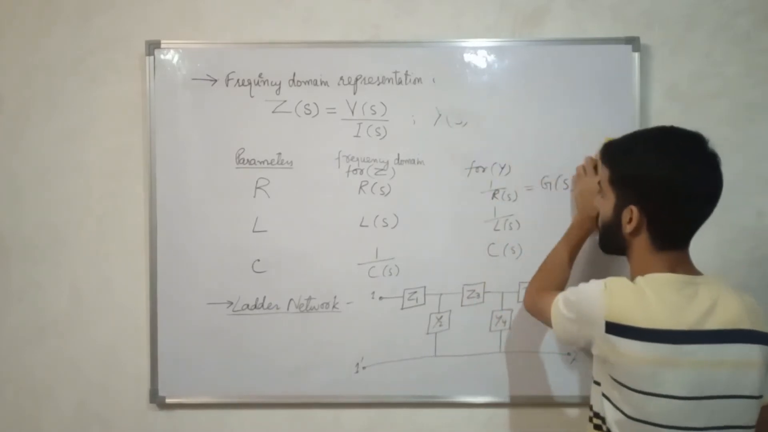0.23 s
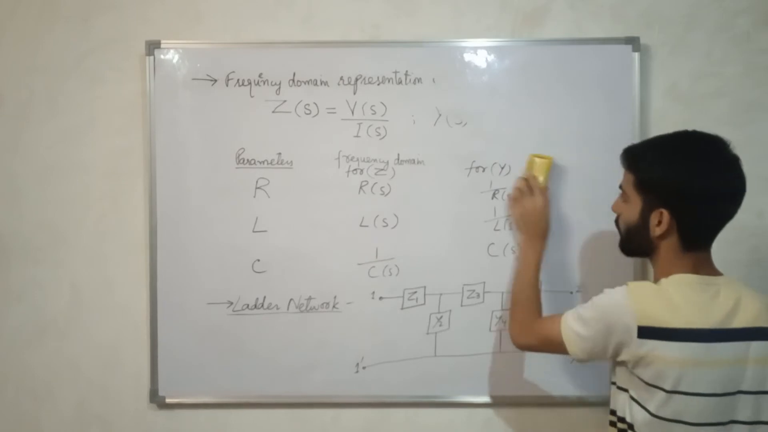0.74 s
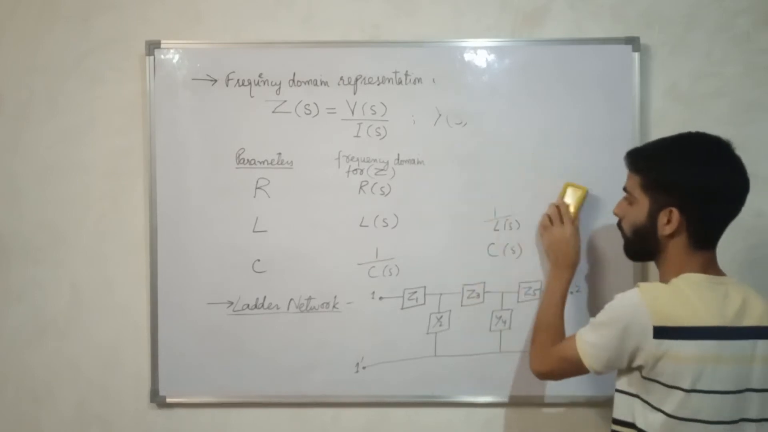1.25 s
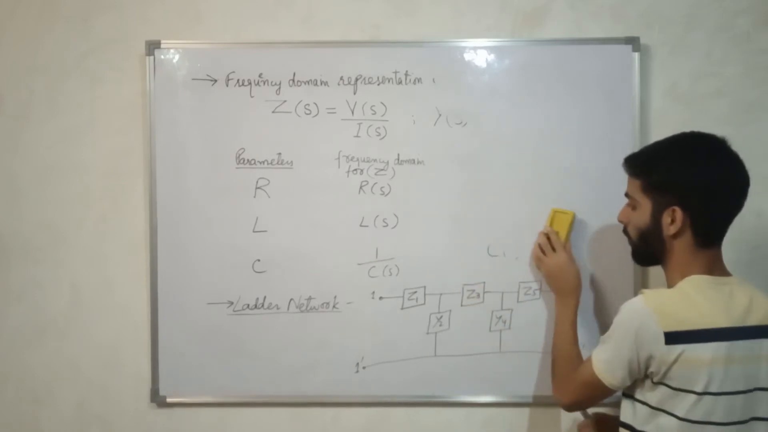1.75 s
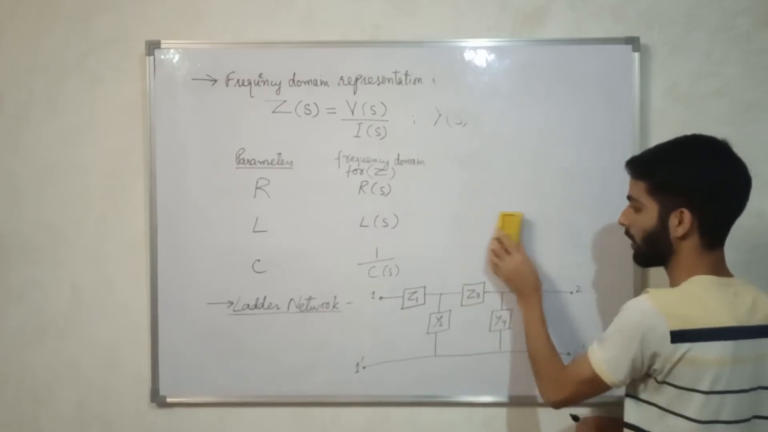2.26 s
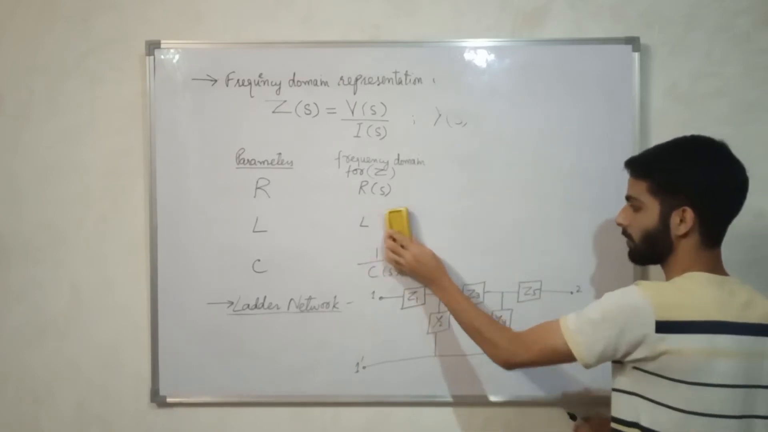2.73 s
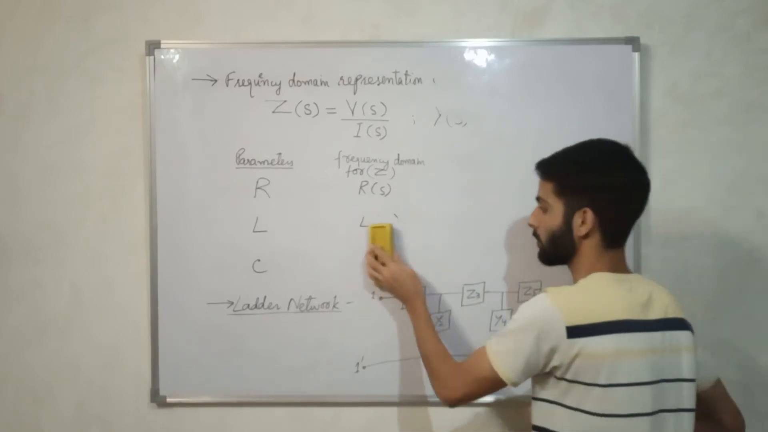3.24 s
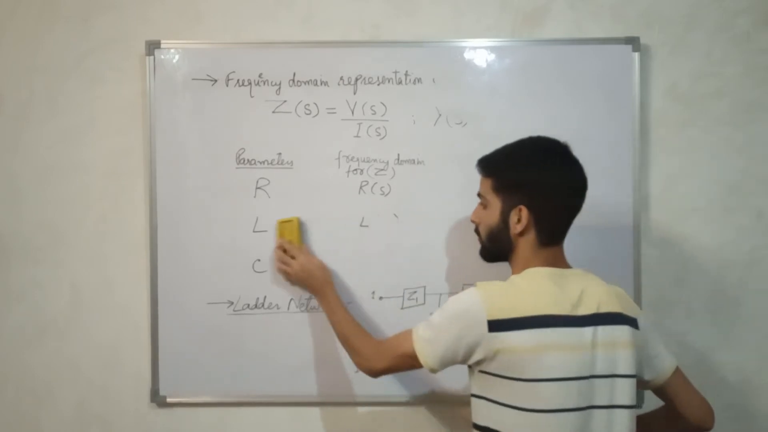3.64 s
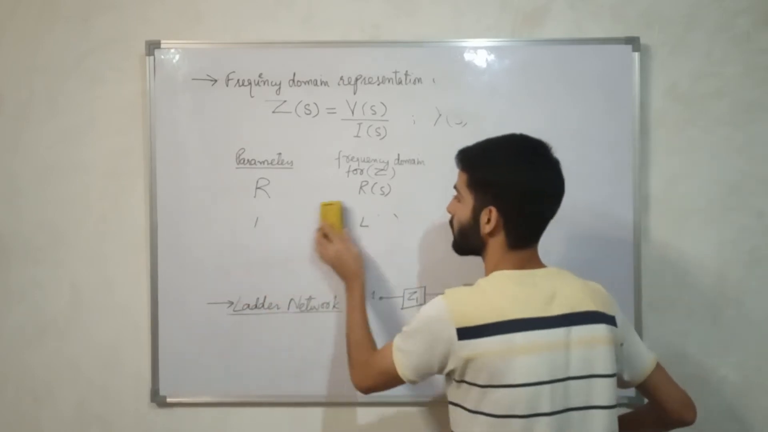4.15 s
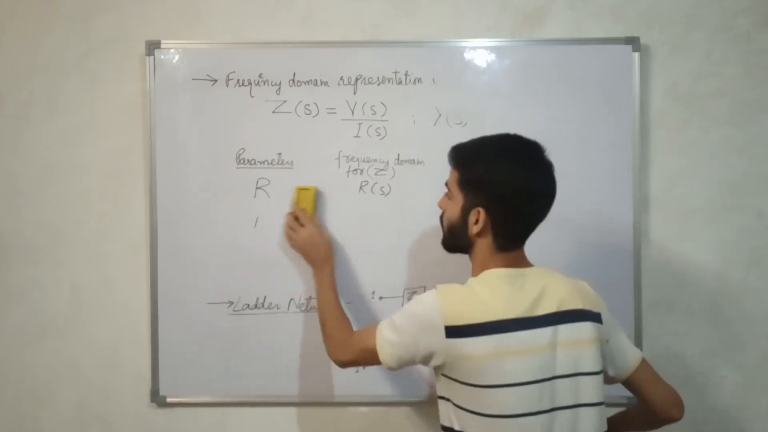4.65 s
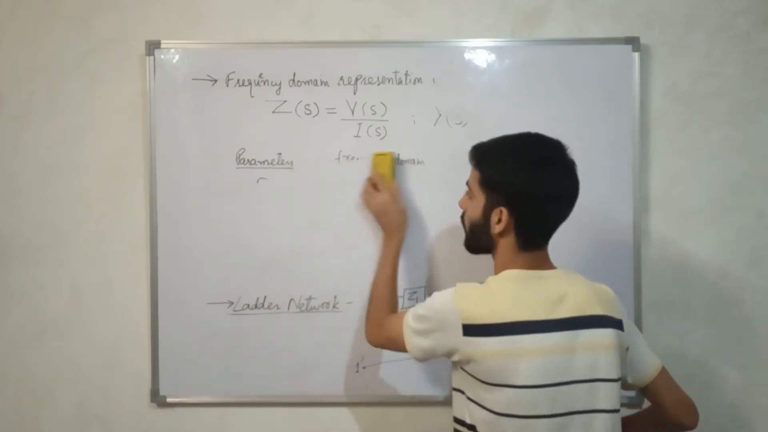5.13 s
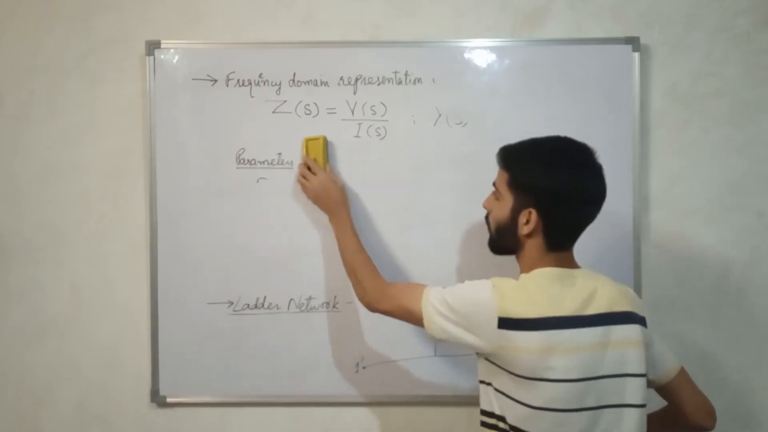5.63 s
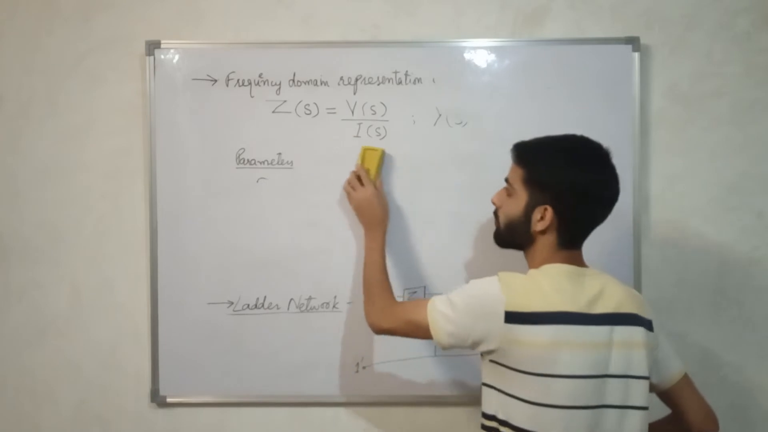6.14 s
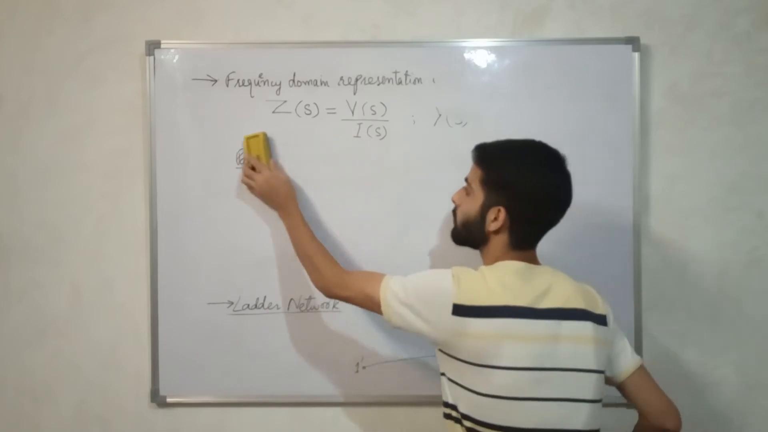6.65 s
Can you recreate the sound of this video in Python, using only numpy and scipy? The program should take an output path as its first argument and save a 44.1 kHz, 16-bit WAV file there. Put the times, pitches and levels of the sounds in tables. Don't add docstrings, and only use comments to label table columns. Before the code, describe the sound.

Quick whiteboard wiping begins at once, two to four strokes a second, with soft gaps between. Over the airy scrape come hollow low bumps and small clacks of the board against the wall, lively in the first three seconds, sparser and lighter midway, then a late cluster. Strokes lengthen somewhat. Quiet room air and a faint hum lie beneath, heard at modest distance in a small hard room.

```python
import sys
import numpy as np
from scipy import signal
from scipy.fft import rfft, irfft, next_fast_len
from scipy.io import wavfile
from scipy.ndimage import uniform_filter1d, map_coordinates

SR = 44100
rng = np.random.default_rng(int(sys.argv[2]) if len(sys.argv) > 2 else 0)


def voltage_ratio(level):
    return 10 ** (np.asarray(level, float) / 20)


def generate_wav(sig):
    pcm = np.round(np.clip(np.atleast_2d(sig).T, -1, 1) * 32767).astype(np.int16)
    wavfile.write(sys.argv[1], SR, pcm)


N = 303849

# frequency in Hz, width in Hz, level in dB.
LOWER_MODES = [(152, 21, -9), (193, 31.5, -9.5), (245, 23.4, -1), (291, 24.2, -2), (341, 24, -11.5)]
# frequency in Hz, width in Hz, level in dB.
UPPER_MODES = [(391, 31.3, 0.5), (433.5, 28.5, -6.5), (444, 27.5, -1.5), (513, 71, -13), (550, 12, -8),
               (636, 65, -21.5), (750, 10, -38.5), (788, 140, -25.5)]
# drag in dB re the hiss, its growth along the stroke in dB,
# block level in dB re the hiss, braking time into the next turn in s.
PAD_SEAT = [(-9, 2, -17.5, .08), (-8.5, 4, -14.5, 0.077), (-11.5, 1.5, -22, 0.054), (-7, 4, -15.5, .11),
            (-9.5, 3, -18.5, 0.063), (-6.5, 8, -14, 0.097), (-10, 3, -21.5, 0.058), (-5, 4, -15, 0.092),
            (-8, -1.5, -23, 0.054), (-4.5, 1, -15, 0.089), (-8, -6, -17.5, 0.047), (-4.7, 2, -14, 0.076),
            (-7.5, -2.5, -18, .06), (-5, -4, -15, 0.063), (-9.5, -1.5, -19, .065), (-5.5, 1.5, -15, 0.097),
            (-9, .5, -17, 0.096), (-4.5, .5, -11.5, 0.089), (-8, -2, -16, 0.055), (-3.5, 1, -11, 0.084)]


def unit(x):
    return x / np.sqrt(np.mean(x ** 2) + 1e-20)


def along(points, hz):
    f, v = np.transpose(points)
    return np.interp(np.log(hz + 1), np.log(f + 1), v)


def wobble(rate):
    knots = rng.standard_normal(int(N * rate / SR) + 4)
    return map_coordinates(knots, [np.arange(N) * rate / SR])


def filtered(x, response):
    n = x.shape[-1]
    m = next_fast_len(n + SR // 2)
    return irfft(rfft(x, m) * response(np.fft.rfftfreq(m, 1 / SR)), m)[..., :n]


def modes(table):
    def response(f):
        total = 0
        for k, (centre, width, db) in enumerate(table):
            damping = 1j * f * width
            total = total + (-1) ** k * voltage_ratio(db) * damping / (centre * centre - f * f + damping)
        return total
    return response


def ports(pair, alike):
    turn = lambda hz: np.arccos(np.clip(along(alike, hz), -1, 1)) / 2
    mid, side = filtered(pair, lambda hz: np.array([np.cos(turn(hz)), np.sin(turn(hz))]))
    return np.array([mid + side, mid - side])


def slips(rate, spread_db, channels):
    shape = (channels, N)
    events = (rng.random(shape) < rate / SR) * rng.choice([-1, 1], shape)
    return events * voltage_ratio(spread_db * np.clip(rng.standard_normal(shape), -2, 2))


def patchy(x, depth_db):
    z = signal.stft(x, nperseg=512)[2]
    field = uniform_filter1d(rng.standard_normal(z.shape[1:]), size=6, axis=0)
    field = uniform_filter1d(field, size=10, axis=1)
    return signal.istft(z * voltage_ratio(depth_db * unit(field)), nperseg=512)[1][:, :N]


def air():
    # frequency in Hz, density in dB per Hz.
    air_spectrum = [(15, -46), (25, -7.5), (84, 0.5), (189, -2.5), (247, -2), (435, -12.5), (484, -12),
                    (706, -20.5), (950, -22), (1500, -27), (1860, -27), (4290, -23.5), (6790, -25.5),
                    (9380, -19.5), (15600, -44)]
    # frequency in Hz, frequency wander in Hz, rms level in dB.
    drone_tones = [(49, 1.5, -74), (98.15, 3.55, -66.5), (143.5, 5.94, -78)]
    noise = rng.standard_normal((2, N))
    hush = voltage_ratio(-58) * unit(filtered(noise, lambda hz: voltage_ratio(along(air_spectrum, hz))))

    def tone(hz, wander):
        phase = 2 * np.pi * np.cumsum(hz + wander * wobble(9)) / SR
        return voltage_ratio(1.3 * wobble(7.7)) * np.sin(phase)

    drone = 0
    for hz, wander, db in drone_tones:
        drone = drone + voltage_ratio(db) * unit(np.array([tone(hz, wander), tone(hz, wander)]))
    return ports(hush + drone, [(40, 0.083), (120, 0.41), (300, 0.35), (900, 0.017)])


def room(x, gap):
    # frequency in Hz, left-right likeness from 0 to 1.
    likeness = [(40, .3), (100, 1), (170, 1), (300, 0.86), (500, 0.3), (800, 0.056), (1200, .02)]
    # frequency in Hz, 60 dB decay time in s.
    decay_times = [(150, 0.41), (500, 0.39), (2000, 0.26), (8000, 0.13), (15000, 0.056)]
    place = np.arange(N) / SR * 5.1
    late = round(gap * SR)
    wet = 0
    for share in (np.cos(place) ** 2, np.sin(place) ** 2):
        hz, t, z = signal.stft(rng.standard_normal((2, SR // 2)), SR, nperseg=256)
        decay = voltage_ratio(-60 * t / along(decay_times, hz)[:, None])
        tail = signal.istft(z * decay, SR, nperseg=256)[1]
        tail = ports(tail / np.linalg.norm(tail, axis=1, keepdims=True), likeness)
        wet = wet + signal.oaconvolve(np.pad(x * share, (late, 0))[None], tail, axes=1)[:, :N]
    return wet


def strokes():
    # start in s, hush at the turn in dB,
    # speeding-up time in s, fibre hiss in dB, gain along the stroke in dB.
    stroke_rows = [(-0.05, 7, 0.11, -57.5, -3), (.31, 14.5, 0.079, -55, 1), (.55, 16, 0.079, -57, 1),
                   (.73, 13, 0.084, -55, -5), (1.069, 10, .16, -56.5, -1), (1.34, 11, 0.062, -55, 3.5),
                   (1.584, 21, .11, -56, -3), (1.83, 16.5, 0.096, -54.5, -0.5), (2.09, 14.5, .06, -57, 7.5),
                   (2.26, 13, .1, -55, -3.5), (2.76, 17, 0.077, -61, 6), (2.97, 16.5, 0.094, -56.5, 0.5),
                   (3.28, 10, 0.11, -58.5, 2), (3.451, 20, 0.11, -55, -3.5), (4.01, 12.5, .1, -57, 1.5),
                   (4.49, 16.5, 0.083, -53.5, 1), (4.989, 14.5, .08, -56, -0.8),
                   (5.45, 12.5, 0.054, -56, 3.5), (5.759, 14, 0.12, -57, 0), (6.04, 17.5, .08, -59, -6),
                   (6.93, 8, .1, -57, -0.3)]
    start, hush, rise, hiss, gain = np.transpose(stroke_rows)
    braking = np.transpose(PAD_SEAT)[-1]
    t = np.arange(N) / SR
    k = np.searchsorted(start, t) - 1
    way = (t - start[k]) / (start[k + 1] - start[k]) - .5
    ramp = lambda s, length: np.clip(1 - s / length, 0, 1) ** 1.25
    leaving = hush[k] * ramp(t - start[k], rise[k])
    arriving = hush[k + 1] * ramp(start[k + 1] - t, braking[k])
    still = np.maximum(leaving, arriving)
    smooth = lambda v: uniform_filter1d(v, size=1500)
    return k, way, smooth(hiss[k] + gain[k] * way), still, smooth


def knocks():
    # frequency in Hz, level in dB.
    crack_spectrum = [(300, 14.5), (600, 2), (900, -6), (1500, -8.5), (2700, 1), (4300, -6.5), (8000, -15),
                      (15000, -23)]
    # time in s, peak in dB, crack in dB re the peak,
    # clack in dB re the peak, pitch in Hz.
    hard_knocks = [(.012, -44.5, -13.5, -7, 287), (.411, -41, -14, -17, 209), (.854, -32.5, -23.5, -8, 233),
                   (.945, -28, -21.5, -7, 291), (1.184, -37.5, -22.5, -12, 245),
                   (1.264, -35.5, -16, -9.5, 283), (1.516, -24, -21.5, -7.5, 286),
                   (1.548, -51, -27, -11, 286), (1.778, -39.5, -14.5, -1.5, 291),
                   (1.947, -35.5, -25, -6, 254), (2.22, -34.5, -13, -2, 278),
                   (2.297, -31.5, -19.5, -4.5, 268), (2.753, -35.5, -17.5, -12, 261),
                   (3.061, -45, -22, -12, 224), (3.759, -41.5, -25, -24, 285), (4.123, -44.5, -19, -9, 240),
                   (4.634, -30, -35, -17, 271), (5.219, -35, -42, -21, 268), (5.559, -39, -36, -17, 280),
                   (5.599, -28, -34, -14, 245), (5.629, -30.5, -32, -13, 236), (5.859, -35, -32, -17, 245),
                   (5.871, -25, -23, -15, 266)]
    # time in s, peak in dB, pitch in Hz, rise in s.
    soft_bumps = [(.798, -32, 224, .006), (.883, -29, 240, 0.0054), (.988, -42, 280, .006),
                  (1.052, -38, 291, 0.0064), (1.408, -34.5, 248, .006), (1.445, -27.5, 245, 0.0085),
                  (2.263, -37.5, 281, 0.0087), (2.347, -39, 263, .007), (2.388, -38.5, 302, 0.0062),
                  (2.479, -40, 266, .005), (2.507, -41, 284, .006), (3.355, -44.5, 242, 0.0043),
                  (3.534, -27.5, 246.6, 0.0061), (4.243, -34.5, 253, 0.0038), (4.334, -37, 261, 0.0056),
                  (4.573, -33, 253, 0.0042), (4.654, -34, 255, .005), (4.725, -38, 248, 0.0061),
                  (5.156, -35.5, 268, 0.0079), (5.715, -41.5, 245, 0.0065), (5.974, -38, 264, 0.0093),
                  (6.037, -34.5, 237, 0.0048)]
    blows = [(*row, 0.0046) for row in hard_knocks]
    blows += [(s, db, -76 - db, -56 - db, hz, rise) for s, db, hz, rise in soft_bumps]

    thud, clack, crack = np.zeros(N + SR), np.zeros(N), np.zeros(N + SR)
    t = np.arange(SR // 8) / SR
    noise = rng.standard_normal((len(blows), len(t)))
    bright = unit(filtered(noise, lambda hz: voltage_ratio(along(crack_spectrum, hz))))
    muffling = lambda hz: 1 / (1 + (hz / 2300) ** 4) * hz / (hz + 500) / (1 + hz / 1500)
    dull = voltage_ratio(-4) * unit(filtered(noise, muffling))
    still = strokes()[3]
    fade = voltage_ratio(-60 * t / .045) + .9 * voltage_ratio(-60 * t / .01)
    for (s, db, crack_db, clack_db, hz, rise), sharp, soft in zip(blows, bright, dull):
        i = round(s * SR)
        u = t / np.clip(rise, .001, .012)
        thud[i:][:len(t)] += voltage_ratio(db - 3.0) * (u * np.exp(1 - u)) ** 2 * np.sin(2 * np.pi * hz * t)
        clack[i] = voltage_ratio(db + clack_db + 41)
        hard = np.clip((db + crack_db + 61) / 8, 0, 1) * (still[i] < 15)
        burst = hard * sharp + (1 - hard) * soft * voltage_ratio(-60 * t / .07)
        crack[i:][:len(t)] += voltage_ratio(db + crack_db + 3) * fade * burst
    ring = voltage_ratio(-10) * filtered(thud, modes(LOWER_MODES))
    return (thud + ring)[:N] + filtered(clack, modes(UPPER_MODES)), crack[:N]


def judder():
    # time in s, rise in s per 10 dB, fall in s per 10 dB,
    # lower modes in dB, upper modes in dB re the lower.
    leans = [(.03, 15, 0.14, -51.5, -7), (.41, 0.1, 0.2, -57, -11.5), (.85, 0.05, 0.17, -43, -15),
             (.96, 0.0658, 0.08, -42.5, -3.5), (1.15, 0.07, 0.64, -50.5, -10), (1.44, 0.06, 0.26, -42, -16),
             (1.53, 0.02, 0.13, -44, -4), (1.78, -0.06, -0.02, -54, -2.5), (1.97, 0.06, 0.04, -44.5, -6.5),
             (2.235, 0.1, -0.05, -50, 0), (2.42, 0.21, 0.14, -45, -9), (3.12, .05, 0.26, -56.5, -16),
             (3.36, .03, 0.06, -55, -10.5), (3.55, 0.04, 0.06, -44.5, -20), (3.77, 0.1, 0.1, -48.5, -8.5),
             (4.2, -0.01, 0.14, -49, -9.5), (4.38, 0.07, .05, -45.5, -12.5), (4.63, 0.09, 0.16, -42.5, -22),
             (4.85, .1, .07, -53, -5.5), (5.23, 0.15, 0.17, -43.5, -11), (5.62, .13, 0.12, -42, -10.5),
             (5.868, 0.01, 0.13, -42.5, -6.5), (5.98, 0.1, .12, -53.5, -18), (6.19, 0.04, 0.14, -47, -20)]
    pushes = slips(700, 3.5, channels=1)[0] * voltage_ratio(2.35 * np.tanh(wobble(45)))
    hiss_db, still = strokes()[2:4]
    lower = voltage_ratio(hiss_db - still - 5.5) ** 2
    upper = lower * voltage_ratio(-10) ** 2
    t = np.arange(N) / SR
    for s, rise, fall, db, upper_db in leans:
        near = slice(max(0, round((s - 3 * rise) * SR)), round((s + 3 * fall) * SR))
        away = np.where(t[near] < s, (s - t[near]) / rise, (t[near] - s) / fall)
        lean = voltage_ratio(db - 10 * away ** 1.92) ** 2
        lower[near] += lean
        upper[near] += lean * voltage_ratio(upper_db) ** 2
    drum = lambda family: unit(filtered(pushes, modes(family)))
    return voltage_ratio(-3) * np.sqrt(lower) * drum(LOWER_MODES) + voltage_ratio(-4) * np.sqrt(upper) * drum(UPPER_MODES)


def felt():
    # frequency in Hz, width in Hz, level in dB.
    fibre_modes = [(6020, 2640, -7.5), (8250, 1180, 1.5), (9820, 1660, 0), (14800, 12000, -22)]
    drag_modes = [(4130, 1070, 4.5), (5300, 2200, -5)]
    heavy_modes = [(2507, 434, -2.5), (2900, 690, 1)]
    block_modes = [(1350, 137, 5), (1578, 175, 4.5), (2200, 450, -2)]
    k, way, hiss_db, still, smooth = strokes()
    drag, build, block, _ = np.transpose(PAD_SEAT)
    arch_db = 3 * (.3 - 4 * way ** 2)
    drag_db = smooth(drag[k] + build[k] * way + arch_db)
    heavy_db = 1.34 * drag_db - 2.5
    block_db = smooth(block[k])

    fibres = patchy(slips(9000, 2.0, channels=2), depth_db=0.94)
    pad = patchy(slips(6000, 3, channels=2), depth_db=1.0)
    low_pad = filtered(pad, lambda hz: 1 / (1 + (1150 / (hz + 1)) ** 6))
    rub = lambda source, table, db: voltage_ratio(db) * unit(filtered(source, modes(table)))
    rubbing = rub(fibres, fibre_modes, 1.0 - still)
    rubbing = rubbing + rub(pad, drag_modes, drag_db - 0.73 * still)
    rubbing = rubbing + rub(pad, heavy_modes, heavy_db - 0.74 * still)
    rubbing = rubbing + rub(low_pad, block_modes, block_db - 0.73 * still)
    return rubbing * voltage_ratio(hiss_db + 0.42 * wobble(15))


def scene():
    thud, crack = knocks()
    thin = lambda hz: (1j * hz / (1j * hz + 95)) ** 3
    panel, crack = filtered(np.array([judder() + thud, crack]), thin)
    rubbing = felt()
    near = panel + voltage_ratio(-1.0) * crack + voltage_ratio(1.0) * rubbing
    into_room = voltage_ratio(-6.5) * panel + voltage_ratio(2.0) * crack + voltage_ratio(-6.5) * rubbing[0]
    return near + room(into_room, gap=.008) + air()


def low_pass(x):
    return signal.sosfilt(signal.butter(12, 15800, fs=SR, output="sos"), x)


def record(dry):
    heard = filtered(dry, lambda hz: (1j * hz / (1j * hz + 45)) ** 3)
    return low_pass(heard)


dry = scene()
out = record(dry)
generate_wav(out)
```